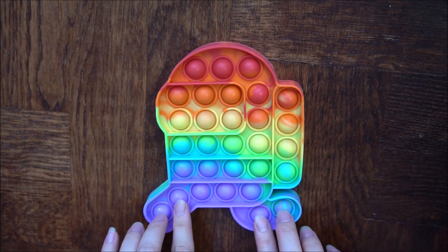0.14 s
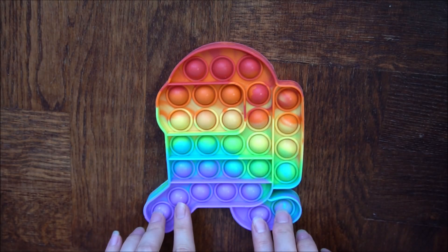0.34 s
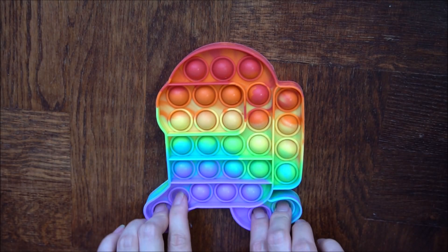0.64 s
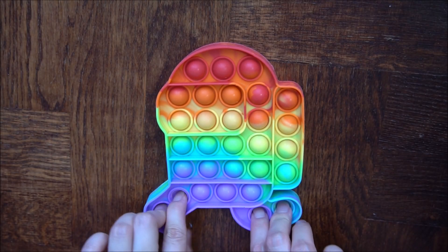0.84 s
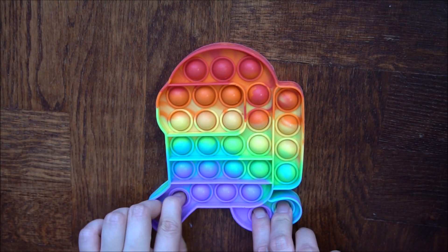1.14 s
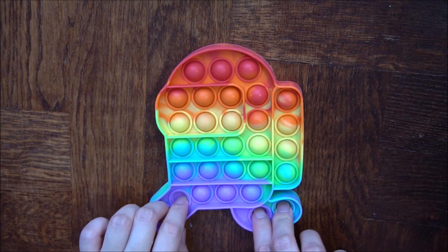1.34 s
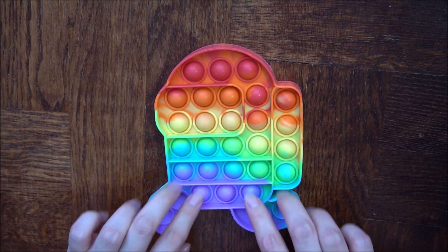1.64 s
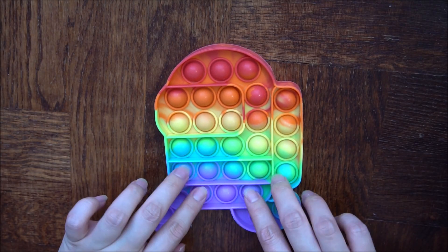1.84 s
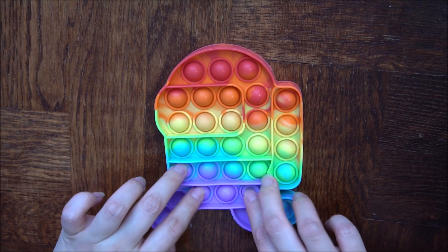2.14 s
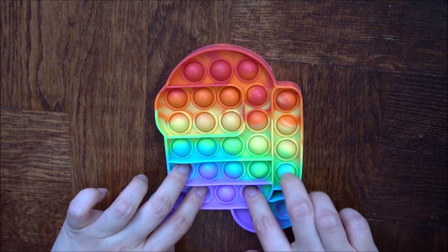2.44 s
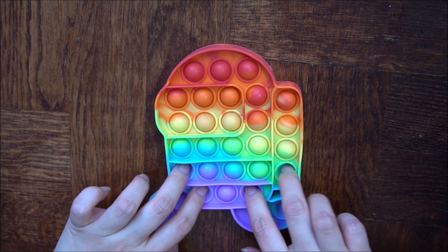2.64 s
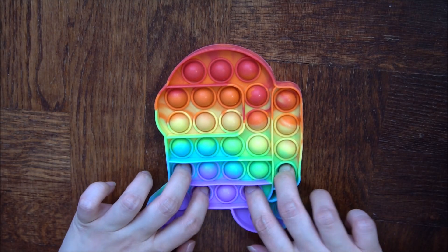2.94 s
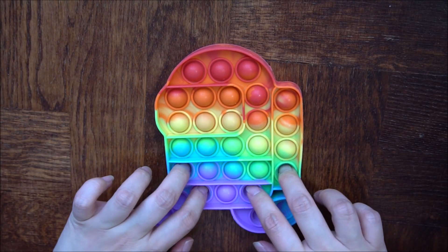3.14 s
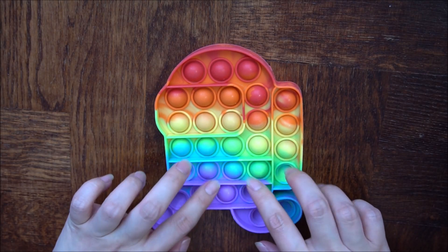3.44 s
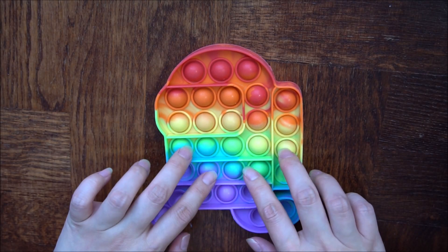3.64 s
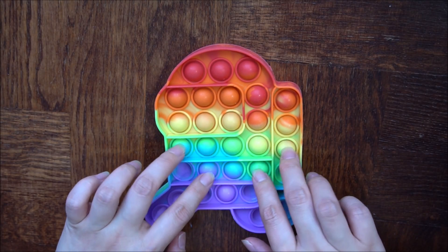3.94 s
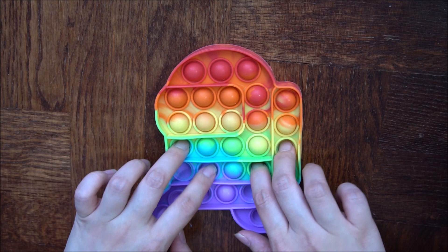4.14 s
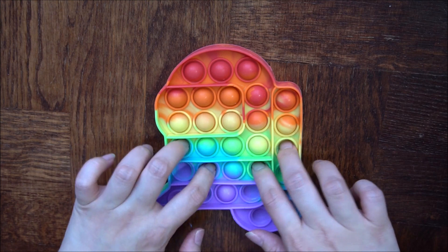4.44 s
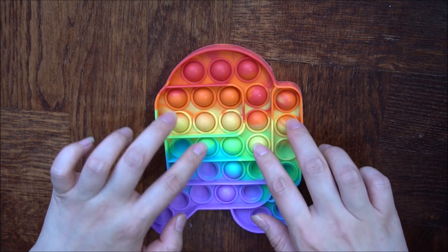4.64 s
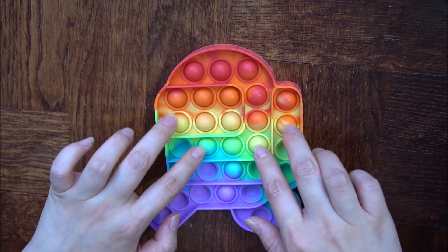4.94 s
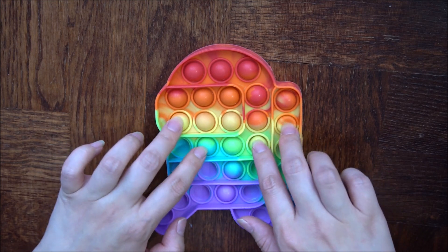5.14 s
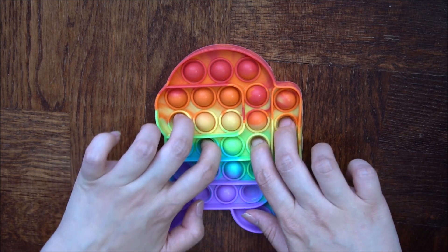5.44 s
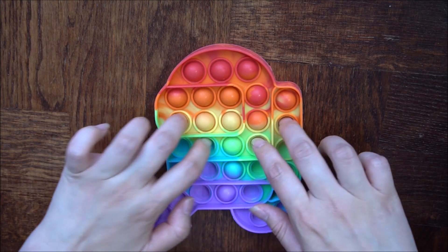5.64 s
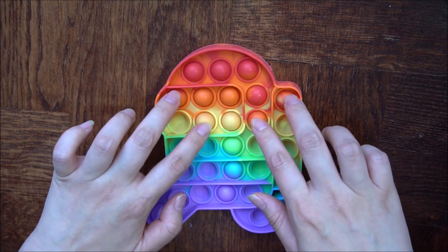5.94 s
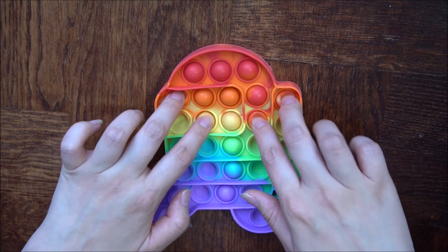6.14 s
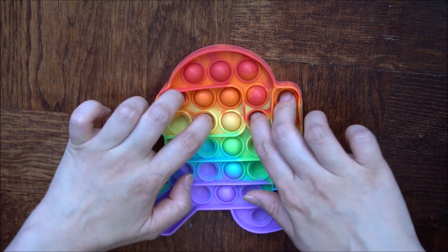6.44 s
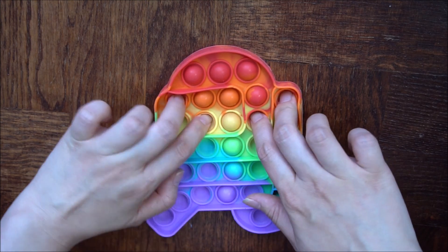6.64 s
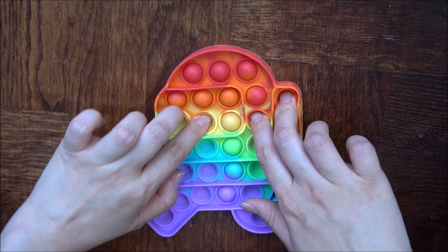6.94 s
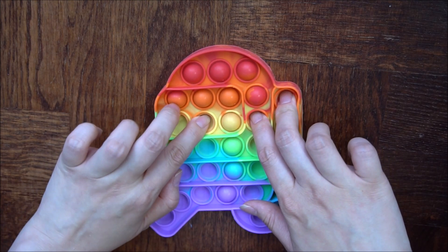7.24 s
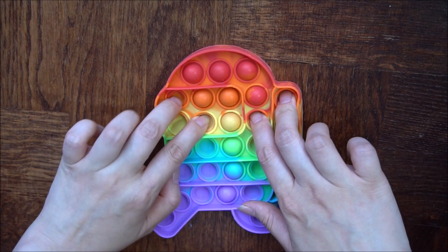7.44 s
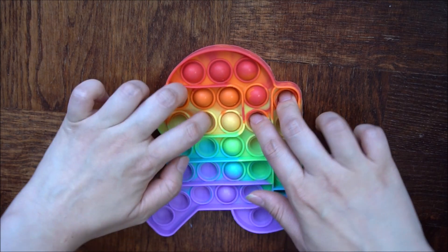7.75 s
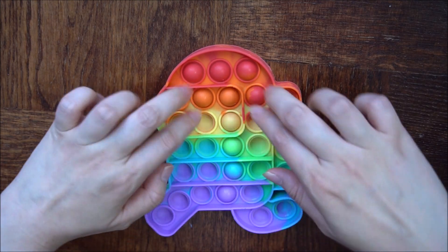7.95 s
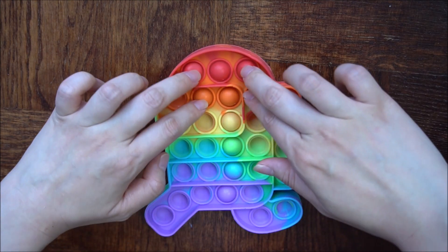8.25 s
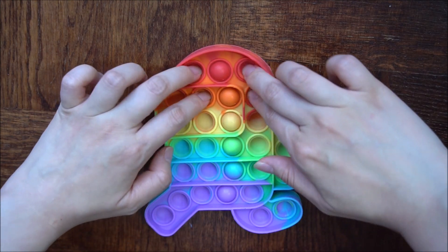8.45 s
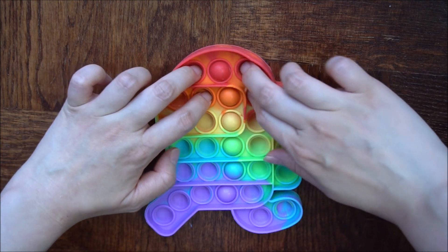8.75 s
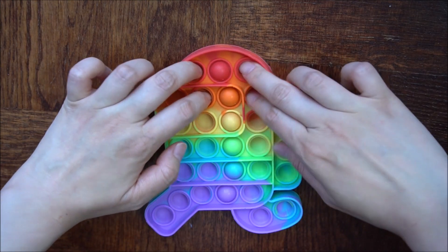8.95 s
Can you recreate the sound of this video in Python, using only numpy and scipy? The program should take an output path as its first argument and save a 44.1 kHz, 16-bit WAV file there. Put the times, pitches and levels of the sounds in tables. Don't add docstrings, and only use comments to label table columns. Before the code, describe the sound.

A silicone bubble toy is popped in irregular bursts on a wooden tabletop. Short hollow rubbery pops come with clicky slaps, peeling skin and dull little table thuds; between them lie barely audible dents, squeaks and rubs. Loudest is a single hard, bright crack two thirds through. Recorded close in a small room with short reflections, soft ventilation rumble, faint hiss and a very thin high whine.

```python
import sys
import numpy as np
from scipy import signal
from scipy.io import wavfile

SR = 44100
rng = np.random.default_rng(int(sys.argv[2]) if len(sys.argv) > 2 else 0)


def makeup_ratio(level_db):
    decades = np.asarray(level_db, float) / 20
    return 10 ** decades


def file_out(sig):
    cols = np.atleast_2d(sig).T
    lim = np.clip(cols, -1, 1)
    pcm = np.round(lim * 32767).astype(np.int16)
    wavfile.write(sys.argv[1], SR, pcm)


N = 401751

# (frequency [Hz], density [dB per Hz])
AIR_COLOUR = [(24, -16), (40, -7), (100, -2.5), (270, -7), (800, -10.5), (2260, -18), (4810, -22.5),
              (14000, -26.5)]
# (frequency [Hz], left-right likeness [-1 to 1])
AIR_LIKENESS = [(60, 0.96), (130, 0.73), (290, 0.13), (640, -0.22), (1410, -0.25), (3100, 0.018),
                (6820, 0.12), (15000, 0.24)]
# (time [s], level [dB])
RUMBLE_SWELL = [(0, -61.5), (.75, -62), (1.44, -64), (2.4, -58.5), (3.2, -61.5), (4.1, -57), (4.95, -62),
                (5.15, -57), (5.3, -62), (6.391, -64.5), (6.6, -60.5), (7.5, -52.5), (7.9, -66), (8.3, -57),
                (8.68, -49), (8.8, -59.5), (9.11, -46)]
# (frequency [Hz], width [Hz], level [dB])
RUMBLE_MODES = [(67.6, 5.7, -11), (130.3, 10, 0.5), (184.5, 14, 0.5)]
# (frequency [Hz], width [Hz], level [dB])
WHINE_LINES = [(5475, 30, .5), (10950, 40, -1.5), (13151, 16, 2)]
# (time [s], level [dB])
WHINE_SWELL = [(0, -78), (3.8, -78), (4.45, -74), (4.8, -76), (6, -77), (6.7, -80), (7.6, -76), (9.11, -78)]
# (time [s], peak [dB], frequency [Hz], left-right [dB], width [share of frequency])
SLAPS = [(0.5542, -30, 4600, 3, 0.82), (0.5732, -27, 2570, 1, 0.67), (0.6733, -18.5, 2270, -4, 0.74),
         (0.9421, -37.5, 5500, 1, 0.72), (1.714, -39, 4130, 0.6, 0.42), (2.272, -42, 2860, 2.1, 0.6),
         (2.2966, -37, 2650, -1.1, 0.53), (4.1284, -29, 2300, 1.1, 0.51), (4.1376, -27, 3930, 1, 0.72),
         (4.2028, -27.5, 2370, 3, 0.37), (4.4625, -48, 3750, 0, 0.6), (4.5093, -41, 2560, 3, 0.82),
         (4.5413, -38, 2410, 2, 0.54), (5.2403, -32.5, 2720, -3, 0.32), (5.335, -23.5, 2320, 9, .99),
         (5.7202, -36.5, 3400, 0.6, 0.97), (7.2228, -43, 2350, 0.6, 0.6), (7.3925, -38, 3100, 5, 0.29),
         (7.5226, -30.5, 4050, 0, 0.39), (8.4744, -36, 3140, 0, 0.37), (8.827, -40, 2470, 3, 0.94),
         (8.9977, -42, 2930, -4, 0.79)]
# (time [s], peak [dB], frequency [Hz], left-right [dB])
PEELS = [(0.5547, -42, 7630, 0.6), (0.573, -28.5, 6770, 0), (0.6737, -16, 11000, 0), (2.2966, -41, 7390, 0),
         (2.6432, -40.5, 8040, 0.6), (4.109, -38, 8000, -0.6), (4.1376, -27, 6730, -3),
         (4.2028, -37, 7100, 1.5), (5.2407, -40, 8460, 0.6), (5.334, -32, 6760, -5), (5.7206, -38, 6500, 0),
         (7.3925, -43, 8050, 0), (7.515, -23, 11200, 2.1), (8.1637, -42, 8420, 4), (8.4743, -49, 8320, 0),
         (8.6168, -38, 7250, -1.1)]
# (time [s], peak [dB], dome [Hz], ring [cycles], rim against dome [dB])
FLIPS = [(.5548, -32.5, 694, 5.5, -10), (.5739, -15.5, 848, 12, -4), (.5739, -28.5, 1140, 6, -2),
         (.6741, -20, 910, 1.4, 0.5), (.6744, -34, 1290, 2.9, -3), (1.7298, -39, 577, 9, -10),
         (2.2733, -38, 626, 3.8, -12), (2.2808, -31, 514, 8, -6), (2.2979, -35.5, 560, 9.7, 9),
         (2.4162, -37, 566, 8.8, -1.1), (2.6433, -31.5, 365, 6.2, -0.8), (4.128, -13.5, 551, 14, -20),
         (4.1378, -23, 500, 6.6, -7), (4.2031, -18.5, 720, 8.2, -3), (5.3354, -32, 1250, 11, 3),
         (5.3362, -21, 525, 5.4, -3.5), (6.2607, -18.5, 645, 6.5, -8), (6.8779, -27, 800, 3.9, -29),
         (6.9359, -30.5, 500, 2.4, -10), (7.2224, -35.5, 520, 3.4, -5), (7.5238, -33, 450, 3.7, -15),
         (8.4749, -34, 537, 7.8, 3.5), (8.4774, -29.5, 500, 7.5, -24), (8.6243, -40.5, 560, 4, 4)]
# (delay [ms], left [dB], right [dB])
ECHOES = [(2.5, -15, -15), (3.4, -13, -16), (5.9, -18, -14), (6.8, -17, -18), (8.0, -18, -19),
          (26.4, -21, -20)]
# (frequency [Hz], decay by 60 dB [s], level [dB])
TAIL = [(199, 0.84, -15.5), (500, 0.25, -2), (1200, 0.34, -7), (3000, 0.34, -6), (7000, 0.35, -9),
        (14000, 0.26, -14.5)]
# (time [s], peak [dB], frequency [Hz])
THUDS = [(0.572, -40, 310), (0.671, -33.5, 228), (1.724, -45.5, 323), (2.277, -37, 244), (2.295, -36, 220),
         (2.414, -46, 266), (2.64, -40, 350), (4.125, -41.5, 305), (4.198, -42, 328), (5.239, -41.5, 196),
         (5.332, -41, 350), (5.717, -46, 332), (6.255, -35, 340), (6.876, -35.5, 234), (7.221, -40, 192),
         (7.519, -38, 350), (8.473, -33.5, 344), (8.621, -51, 350)]
# (time [s], peak [dB], dome [Hz], rim against
# dome [dB])
MORE_FLIPS = [(.948, -47.5, 380, -13), (1.4738, -47.5, 412, -15), (1.7144, -46, 560, 4.5),
              (1.8237, -48, 576, -12), (1.9663, -46, 384, -15), (4.111, -43, 500, -6), (4.5093, -42.5, 580, -1),
              (4.725, -55.5, 500, 8), (5.7213, -43.5, 560, .1), (6.6975, -56, 450, 7.5), (6.7445, -42, 437, -12),
              (7.394, -41, 423, -2), (7.8476, -48, 675, 0), (8.121, -42, 500, -1.5), (8.3964, -42.5, 580, -21),
              (8.6169, -42, 380, -3), (9.0021, -39, 540, -10.1)]
# (time [s], peak [dB], frequency [Hz])
CHIRPS = [(1.253, -51, 2760), (1.501, -45, 4130), (3.068, -54, 2360), (4.109, -52, 2100),
          (5.0696, -48, 3840), (5.5647, -47, 3700), (6.7445, -46.5, 2320), (6.802, -48, 3550),
          (6.867, -42, 3500), (6.8786, -49, 3500), (7.168, -50, 3620), (7.2935, -55, 2470),
          (7.3077, -53, 3420), (7.6983, -47, 3390), (7.9632, -52, 2380), (8.854, -47, 3930)]
# (time [s], length [s], level [dB], frequency [Hz])
RUBS = [(1.52, 0.17, -60.5, 2800), (1.728, 0.055, -56, 600), (2.265, 0.049, -51, 5040),
        (3.124, 0.036, -54.5, 8500), (3.132, .02, -56, 14000), (3.137, 0.028, -53, 4200),
        (3.166, 0.072, -56.5, 2370), (3.332, .04, -57, 2660), (3.526, 0.031, -58.5, 3500),
        (4.52, 0.032, -50, 577), (4.513, 0.043, -55.5, 3000), (5.708, 0.058, -52, 1510),
        (7.509, 0.012, -40.5, 11000), (7.641, 0.12, -62, 3500), (7.966, 0.071, -57, 3300),
        (8.008, .012, -49.5, 3500), (8.007, .014, -48, 2000), (8.617, 0.038, -56, 1500),
        (8.99, 0.055, -48.5, 575), (8.991, 0.024, -52.5, 7000)]
# (time [s], peak [dB], frequency [Hz], ring [cycles], upper ring against lower [dB])
WALLS = [(2.2967, -36.5, 1770, 7, -5), (2.4184, -46.5, 1480, 8, -2.1), (2.644, -45, 1270, 5, -2),
         (4.1364, -21.5, 835, 11, -7), (4.1302, -25, 720, 12, -9), (4.1287, -27.5, 1550, 11, -14),
         (4.2037, -35, 2220, 6.5, 0.5), (5.241, -14, 906, 4.9, -26), (6.2584, -18.5, 1180, 12.4, -1),
         (6.2613, -26, 1640, 14, -9), (6.7447, -47, 1800, 6.6, -5), (7.5229, -26.5, 920, 7.9, -1),
         (7.5241, -41, 1940, 5, 7.5), (8.4754, -38.5, 1850, 9.4, -2), (8.624, -46, 1560, 8, 0)]
# (time [s], peak [dB])
CRACK = (6.25805, -0.59)
# (frequency [Hz], width [Hz], level [dB])
CRACK_MODES = [(3500, 1600, -3.5), (5500, 1350, -0.5), (7900, 2650, 1), (11000, 4500, -15)]
EDGES_HZ = np.append(20 * 2 ** np.arange(0, 9.6, .5), 19000)


def rms_one(x):
    return x / np.sqrt(np.mean(x ** 2) + 1e-20)


def at_hz(rows, hz, column=1):
    rows = np.array(rows)
    return np.interp(np.log(hz), np.log(rows[:, 0]), rows[:, column])


def bands(size):
    white = rng.standard_normal((2, 2, size))
    for k, (low, high) in enumerate(zip(EDGES_HZ, EDGES_HZ[1:])):
        band = signal.butter(2, [low, high], "band", fs=SR, output="sos")
        yield np.sqrt(low * high), signal.sosfilt(band, white[k % 2])


def spread(pair, alike):
    alike = np.clip(alike, -1, 1)
    middle = np.sqrt(1 + alike) * pair[0]
    side = np.sqrt(1 - alike) * pair[1]
    return middle + side * [[1], [-1]]


def resonance(x, hz, width_hz):
    r = np.exp(-np.pi * width_hz / SR)
    zeros = [(1 - r * r) / 2, 0, (r * r - 1) / 2]
    poles = [1, -2 * r * np.cos(2 * np.pi * hz / SR), r * r]
    return signal.lfilter(zeros, poles, x)


def low_pass(x, hz, order):
    return signal.sosfilt(signal.butter(order, hz, fs=SR, output="sos"), x)


def over_time(rows):
    return makeup_ratio(np.interp(np.arange(N) / SR, *np.transpose(rows)))


def add(out, s, sound):
    i = round(s * SR)
    out[:, i:i + sound.shape[-1]] += sound[..., :N - i]


def air():
    hiss = 0
    for hz, pair in bands(N):
        if hz < 17000:
            hiss = hiss + makeup_ratio(at_hz(AIR_COLOUR, hz)) * spread(pair, at_hz(AIR_LIKENESS, hz))
    return makeup_ratio(-50) * rms_one(hiss)


def rumble():
    noise = spread(rng.standard_normal((2, N)), 1.0)
    drone = 0
    for hz, width_hz, db in RUMBLE_MODES:
        drone = drone + makeup_ratio(db) * rms_one(resonance(noise, hz, width_hz))
    return over_time(RUMBLE_SWELL) * makeup_ratio(-0.5) * rms_one(drone)


def whines():
    noise = spread(rng.standard_normal((2, N)), 0.98)
    lines = 0
    for hz, width_hz, db in WHINE_LINES:
        line = resonance(resonance(noise, hz, width_hz), hz, width_hz)
        lines = lines + makeup_ratio(db) * rms_one(line)
    return over_time(WHINE_SWELL) * lines


def snaps(rows, spray_share, skirt):
    out, t = np.zeros((2, N)), np.arange(1200) / SR
    noise = rng.standard_normal((len(rows), 2, len(t)))
    for (s, db, hz, t60_ms, pan_db, width), pair in zip(rows, noise):
        spray = spray_share * spread(pair, 0.47) * makeup_ratio(-60e3 * t / max(t60_ms, 1))
        click = 1.53 * (t == 0)
        wide = resonance(spray + click, hz, skirt * width * hz)
        tick = resonance(wide, hz, width * hz)
        side_db = np.array([[.5], [-.5]]) * pan_db
        add(out, s + 10 / SR, makeup_ratio(db + 3.0 + side_db) * tick / abs(tick).max())
    return out


def slaps():
    spray_ms_per_khz = 2.3
    rows = [(s, db, hz, spray_ms_per_khz * hz / 1e3, pan_db, width) for s, db, hz, pan_db, width in SLAPS]
    return snaps(rows, spray_share=0.73, skirt=1.67)


def peels():
    t60_ms, width_at_7500_hz, width_per_khz = 6.1, 0.51, .09
    rows = []
    for s, db, hz, pan_db in PEELS:
        width = width_at_7500_hz + width_per_khz * (hz / 1e3 - 7.5)
        rows.append((s, db, hz, t60_ms, pan_db, width))
    return snaps(rows, spray_share=0.27, skirt=1.2)


def ring(hz, cycles, swell, sag):
    turns = hz * np.arange(2600) / SR
    swing = (1 - np.exp(-turns / swell)) ** 2 * makeup_ratio(-60 * turns / cycles)
    phase = turns + sag * (1 - np.exp(-turns))
    return -swing * np.sin(2 * np.pi * phase) / swing.max()


def pop(dome_hz, cycles, rim_hz, rim_db):
    dome = ring(dome_hz, max(cycles, 2), swell=0.28, sag=0.026)
    return dome - makeup_ratio(rim_db) * ring(rim_hz, 7.3, swell=0.43, sag=0.14)


def pops(rows):
    out = np.zeros((2, N))
    for s, db, hz, cycles, rim_db, rim_hz in rows:
        add(out, s - 20 / SR, makeup_ratio(db + 2.5) * pop(hz, cycles, rim_hz, rim_db) * makeup_ratio([[-.3], [.3]]))
    return out


def rim_pitch(dome_hz):
    return 450 + 1.27 * dome_hz


def flips():
    return pops([(*row, rim_pitch(row[2])) for row in FLIPS])


def room(x):
    scatter_db, scatter_t60_s = -22, 0.032
    likeness, build_s = 0.74, 0.014
    t = np.arange(round(.5 * SR)) / SR
    tail = 0
    for hz, pair in bands(len(t)):
        build = 1 - np.exp(-(t / build_s) ** 2)
        late = makeup_ratio(at_hz(TAIL, hz, column=2) - 60 * t / at_hz(TAIL, hz)) * build
        early = makeup_ratio(scatter_db - 60 * t / scatter_t60_s - 2.0 * np.log2(hz / 1000)) * (t > .002)
        tail = tail + (0.028 * late + early) * spread(pair, likeness)
    taps = np.zeros_like(tail)
    for ms, left_db, right_db in ECHOES:
        taps[:, round(ms * SR / 1000)] = makeup_ratio([left_db, right_db])
    answer = tail + low_pass(taps, 4400, order=2)
    return signal.fftconvolve(x, answer, axes=1)[:, :N]


def thuds():
    out = np.zeros((2, N))
    for s, db, hz in THUDS:
        add(out, s + 0.002, makeup_ratio(db + 0.5) * ring(hz, 12.6, swell=0.27, sag=0))
    return out


def more_flips():
    cycles = 7.5
    return pops([(s, db, hz, cycles, rim_db, rim_pitch(hz)) for s, db, hz, rim_db in MORE_FLIPS])


def chirps():
    t60_ms, pan_db, width = 12, 2, 0.076
    rows = [(s, db, hz, t60_ms, pan_db, width) for s, db, hz in CHIRPS]
    return snaps(rows, spray_share=.3, skirt=6.0)


def rubs():
    out = np.zeros((2, N))
    for s, length, db, hz in RUBS:
        size = makeup_ratio(3 * np.minimum(rng.exponential(1, 8000), 4))
        grain = size * rng.standard_normal((2, 8000))
        stroke = np.hanning(min(round(length * SR), 8000))
        rasp = resonance(resonance(spread(grain, 0.68), hz, .5 * hz), hz, 2.2 * hz)
        add(out, s - 0.22 * length, makeup_ratio(db) * stroke * rms_one(rasp)[:, :len(stroke)])
    return out


def walls():
    return pops([(*row, 1.353 * row[2]) for row in WALLS])


def crack():
    out, t = np.zeros((2, N)), np.arange(900) / SR
    spray = .07 * spread(rng.standard_normal((2, len(t))), .4) * makeup_ratio(-60 * t / .012)
    burst = spray + (t == 0)
    tick = 0
    for k, (hz, width_hz, db) in enumerate(CRACK_MODES):
        tick = tick + (-1) ** k * makeup_ratio(db) * resonance(burst, hz, width_hz)
    start, peak_db = CRACK
    add(out, start, makeup_ratio(peak_db) * tick / abs(tick).max())
    return out


def scene():
    background = air() + rumble() + whines()
    toy = slaps() + peels() + flips() + thuds() + more_flips() + chirps() + rubs() + walls() + crack()
    return toy + room(toy) + background


def band_limit(x):
    return signal.sosfilt(signal.butter(12, 16810, fs=SR, output="sos"), x)


def record(dry):
    cut = signal.cheby2(16, 45, 15950, fs=SR, output="sos")
    mix = np.clip(signal.sosfilt(cut, dry), -1, 1)
    return band_limit(mix)


dry = scene()
out = record(dry)
file_out(out)
```